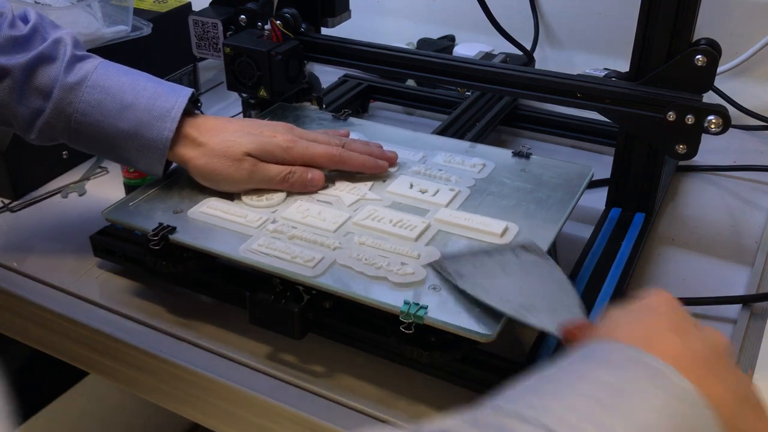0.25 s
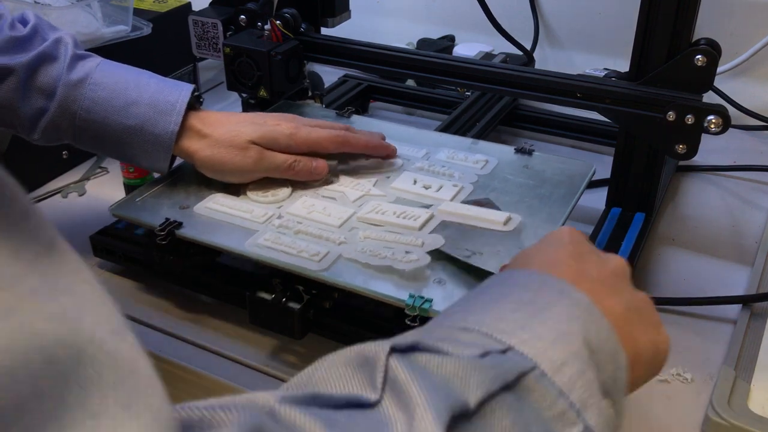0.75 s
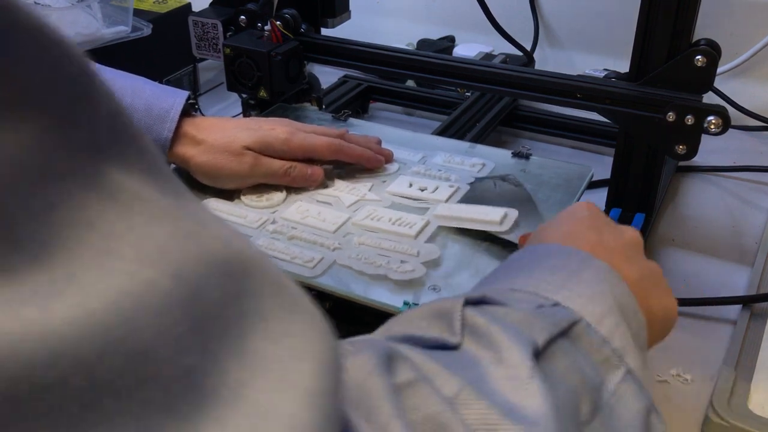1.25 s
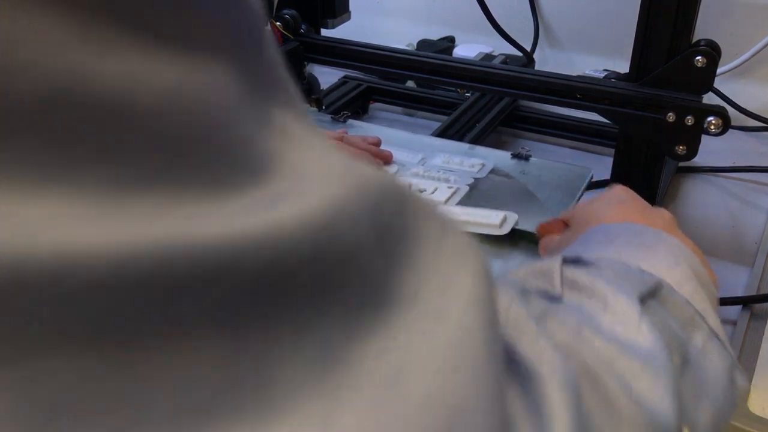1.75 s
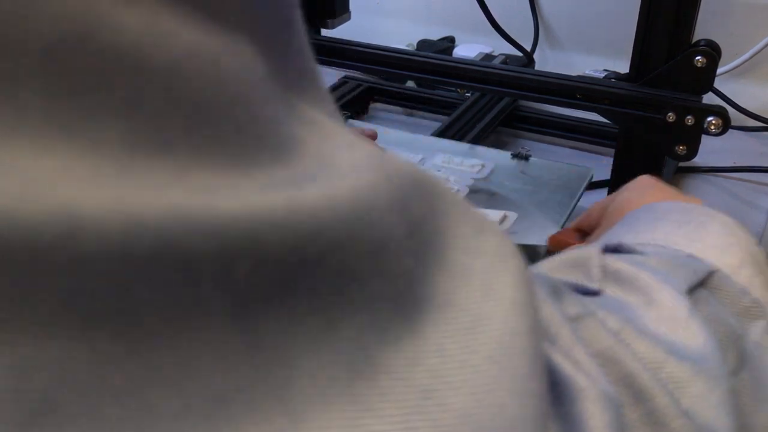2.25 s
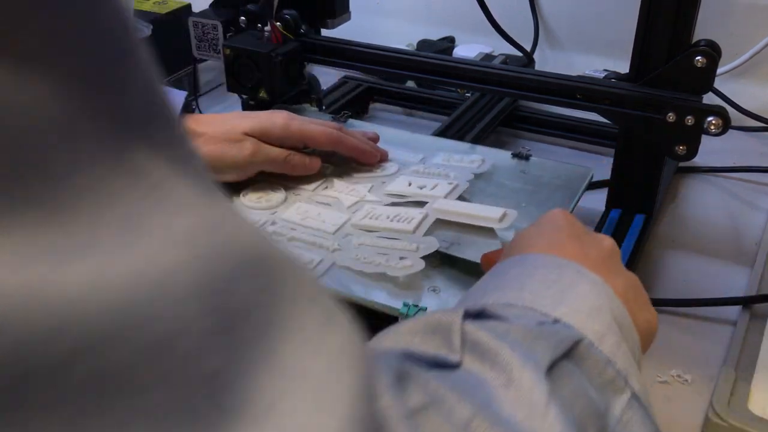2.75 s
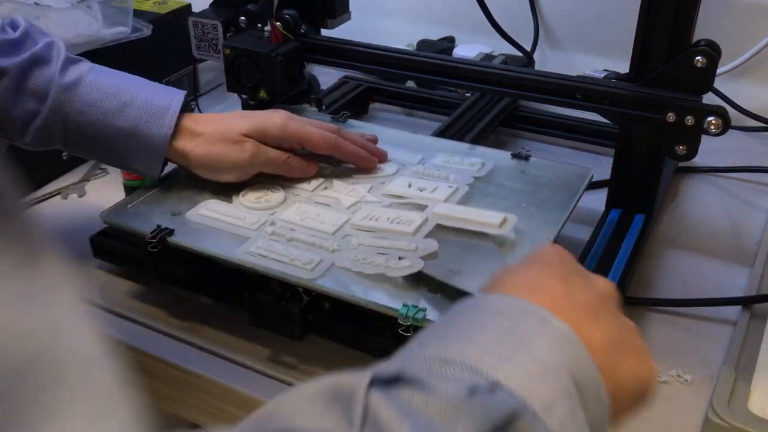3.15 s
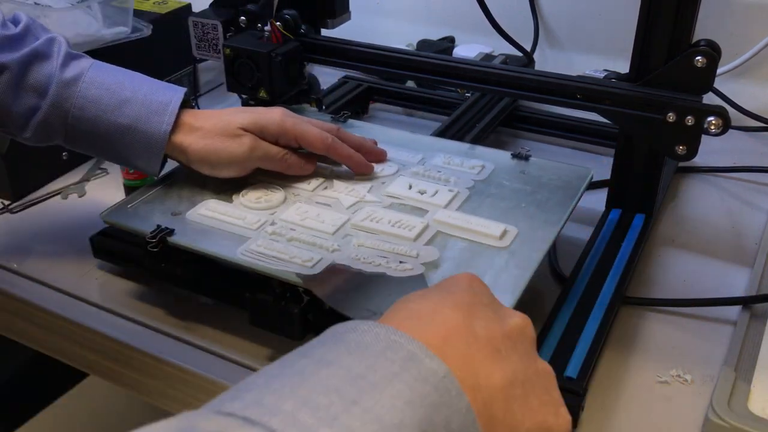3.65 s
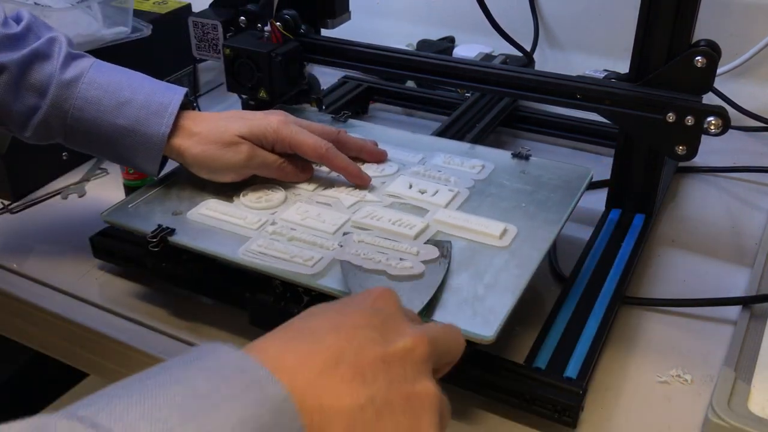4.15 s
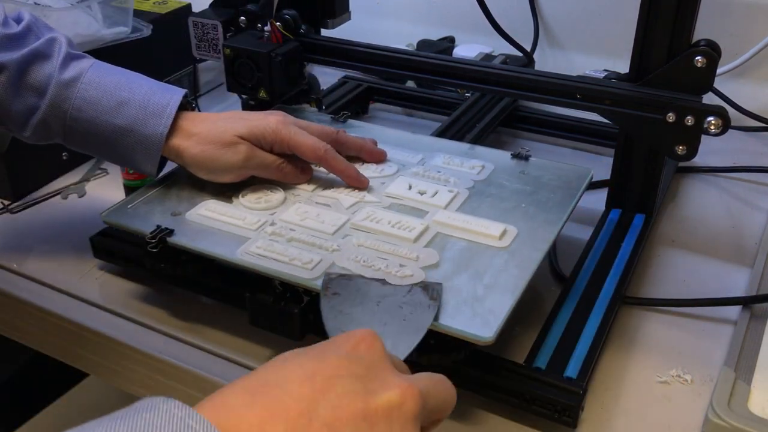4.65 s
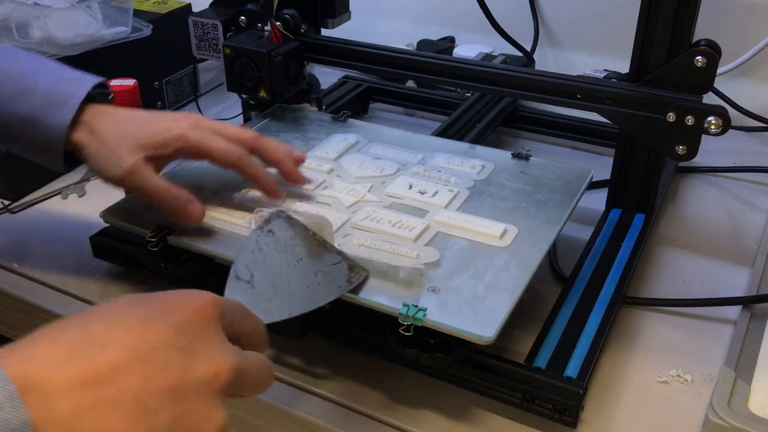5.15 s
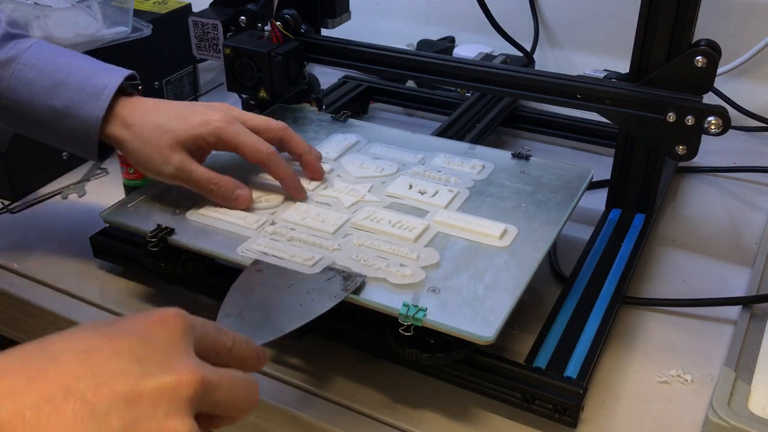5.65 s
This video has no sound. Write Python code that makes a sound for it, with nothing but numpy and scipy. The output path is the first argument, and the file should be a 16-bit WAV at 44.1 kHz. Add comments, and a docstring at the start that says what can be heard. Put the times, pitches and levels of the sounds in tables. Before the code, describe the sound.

A thin metal spatula pries plastic parts off a glass plate with sharp cracks, clicks and short gritty scrapes in a small room.

```python
"""At a workbench in a small room, a thin steel spatula is pushed under plastic parts stuck to a glass plate.
The bond gives way in sharp snaps: bursts of noise and a ringing tone. The blade scrapes gritty strokes of hiss.
The carriage under the plate knocks now and then with a few low tones, and light contact adds a faint treble hiss.
The room answers with short noise tails; ventilation rumbles and rushes behind. A phone close by picks it all up."""
import sys
import numpy as np
from scipy import signal
from scipy.fft import rfft, irfft, next_fast_len
from scipy.io import wavfile
from scipy.ndimage import uniform_filter1d, map_coordinates

SR = 44100
rng = np.random.default_rng(int(sys.argv[2]) if len(sys.argv) > 2 else 0)


def wrap_up_sound(samples):
    """Save the sound to the file named by the first command line argument, as 16-bit audio."""
    columns = np.atleast_2d(samples).T
    # keep every value between -1 and 1, then stretch to whole-number steps
    tamed = np.clip(columns, -1, 1)
    steps = np.round(tamed * 32767).astype(np.int16)
    wavfile.write(sys.argv[1], SR, steps)


N = 259308  # length [samples]

# The bond cracks or the blade hits: (time [s], level [dB], crack over rattle [dB],
# plate over blade body [dB], blade edge over blade body [dB], strongest ring [Hz])
SNAP_EVENTS = [(0.018, -38.5, 4, -1, -5, 3940), (0.029, -20.5, 19, -13, 8.5, 6540),
               (0.3589, -12, 6, -7, -4, 2590), (0.3662, -8.5, -4, -2, 3, 4150),
               (0.389, -16, 7, -19, 11, 6940), (.397, -24, 1, -11, 10, 5900),
               (0.4051, -11.5, 16, -9, -8, 7300), (0.413, -11, 0.5, 0, 4.5, 3640),
               (0.4234, -13, 11, 7, 6, 1635), (0.4542, -11.5, 2, -6.5, 3.5, 3430),
               (0.6256, -24.5, 3.5, -12, 0.5, 6800), (.7304, -36, -6, -1, 6, 1620),
               (0.75, -18.5, 0.5, 10, -2, 1708), (0.9574, -26.5, 6, -8, -1, 6000),
               (1.033, -33, 3, -10, 10, 6900), (1.182, -21.5, 6, -7, 2, 5200), (1.187, -20, 5, -6, 3, 6240),
               (1.2029, -18.5, 8, -7, 4, 6200), (1.2156, -24, -8, 10, -6, 4270),
               (1.2497, -26.5, -11, 4, 9, 2700), (1.264, -24.5, -5, -11, 1, 2890),
               (1.2712, -23, 3, -20, 5, 3980), (1.348, -30.5, -9, -6, -5, 4540),
               (1.362, -41, -13, 21, -20, 1820), (1.5062, -36.5, 3, -6, -2, 5240),
               (1.5246, -33.5, -5, -17, 7, 1910), (1.543, -25.5, 5, -11, 3, 4380),
               (1.553, -34, -9, -13, -15, 2200), (1.594, -39.5, -1, -10, -1, 1010),
               (1.6142, -29.5, 5, 2, 3, 2450), (1.6777, -38, -5, -18, -1, 5470),
               (1.7019, -30.5, -3, -5.5, -4, 5670), (1.7417, -39.5, -7, 38, -15.5, 1773),
               (1.821, -29, -14, 4, 5, 5170), (1.8396, -25, -5, -7, 0, 5200),
               (1.855, -21, 2.5, -5, -3, 5950), (1.873, -23, -10, 1, 8, 6800),
               (1.8863, -18, -5, -4, 10, 6930), (1.895, -23, -1, -9, 14, 6500),
               (1.9032, -11.5, 6, -0.5, 4.5, 4730), (1.913, -24.5, -14, 8, 3, 972),
               (1.936, -23, -4, 1, 0, 5200), (2.078, -31.5, -25, -15, -3, 4740),
               (2.3635, -45, -1, -5, 18, 1010), (2.42, -42, -2, -18, -7, 5560),
               (2.4633, -35, 0, -18, 13, 6260), (2.552, -37.5, -13, -3, -7, 6080),
               (2.6116, -16.5, 1, -3, -4.5, 4330), (2.6614, -24, -7, -3, 1, 2730),
               (2.672, -15.5, -3, -6, 1.5, 5870), (2.787, -39, -8, 2, 1, 4330),
               (2.843, -40, -14, 39, -19, 1970), (2.9568, -24, 11, -1, 9, 6850),
               (2.9644, -26, -9, -14, 1, 6740), (2.9793, -18.5, 24, -13, -2, 6200),
               (2.9846, -13.5, -6, -9, 3, 4100), (3.0052, -16, 4, -3, 3, 5670),
               (3.0347, -31.5, -10, 20, -15, 2910), (3.1348, -30.5, 4, 0, 17, 4460),
               (3.161, -23, 1.5, -3, -9, 4280), (3.1987, -25, -8, 15, 0, 1738),
               (3.328, -34.5, -8, 0, -7, 1860), (3.488, -34, -9, 10, -9, 2700),
               (3.4915, -25.5, -3, -10, 3.5, 1475), (3.7502, -45.5, 0, -4, 20, 1150),
               (3.8274, -20.5, 6.5, -3, 2, 1334), (3.9502, -36, -2, -1, 4, 4530),
               (4.1198, -31, -13, 16, -1, 3100), (4.1361, -22, 8, 11, 10, 3030),
               (4.1503, -13.5, 13, 7, 19, 2680), (4.1725, -24, -5, -2, -4, 6700),
               (4.179, -24, 6, -10, 15, 6300), (4.1825, -19, -9, -10, -1, 6460),
               (4.248, -36.5, -2, -12, 8, 6600), (4.258, -42, -13, 18, -21, 1914),
               (4.4016, -40.5, -2.5, 4, -15, 1670), (4.607, -30, -5, 8, -17, 1923),
               (4.674, -42, -4, 5, -8, 2930), (4.8274, -28.5, 0.5, 3, -5, 1410),
               (4.891, -41, 9, -6, 9, 950), (4.9017, -40, 15, -12, 2, 1520), (4.9824, -40, 5, -10, 5, 1060),
               (5.053, -26.5, 2.5, -3, 8, 6900), (5.1338, -34.5, -17, -12, 0, 6000),
               (5.192, -31.5, -10, -4, -7, 1200), (5.216, -28, -3, 2, 0, 3100),
               (5.234, -41, -2, -4, 7, 4470), (5.2518, -40, 0, 1, 6, 1590), (5.358, -30, -7, -9, -17, 4420),
               (5.407, -19.5, -8, 2, -6, 1228), (5.4095, -14.5, 2.5, -5.5, -1, 2140),
               (5.8767, -24, -4, -3, 4, 1020)]
# The blade slides: (time of most pressure [s], rise [s], fall [s], level [dB], plate over blade body [dB])
STROKE_EVENTS = [(0.206, 0.052, 0.045, -49, -0.5), (0.378, 0.044, 0.039, -31, 3.5),
                 (0.63, 0.036, 0.03, -49.5, 6), (0.744, 0.025, 0.032, -37.5, 8.5),
                 (0.986, 0.058, 0.047, -45.5, 1), (1.024, 0.062, 0.018, -38, 4),
                 (1.147, 0.035, 0.052, -49, -1), (1.178, 0.0088, 0.12, -42.5, 1),
                 (1.352, 0.0051, 0.024, -60, 10), (1.901, 0.017, 0.028, -24, -5),
                 (2.1, 0.087, 0.44, -55.5, -1), (2.28, 0.023, 0.048, -57, -13),
                 (2.462, 0.016, 0.016, -38.5, -6), (2.668, 0.016, 0.027, -35.5, 2.5),
                 (3.001, 0.035, 0.037, -27, -3.5), (3.219, 0.011, 0.18, -46, 5.5),
                 (3.445, 0.015, 0.041, -45.5, 0), (3.491, 0.018, 0.013, -34, 5.5),
                 (3.696, 0.029, 0.034, -47.5, 6.5), (3.833, 0.026, 0.0085, -39, 10),
                 (4.03, 0.046, 0.042, -50, 2.5), (4.155, 0.034, 0.03, -39.5, -6),
                 (4.277, 0.021, 0.075, -51.5, 2), (4.401, 0.008, 0.007, -52, 13),
                 (4.818, 0.046, 0.034, -47, -2.5), (5.19, 0.047, 0.057, -41, 1.5),
                 (5.36, 0.006, 0.15, -49, -10), (5.392, 0.043, 0.0098, -38, 11),
                 (5.86, 0.084, 0.1, -53.5, 5)]
# The carriage under the plate knocks: (time [s], level [dB], frame tone [dB over the knock level])
KNOCK_EVENTS = [(0.367, -46.5, 4.5), (0.439, -53, -13), (0.749, -48.5, 6), (1.371, -41.5, -8),
                (1.746, -38.5, -7), (1.887, -48, 4), (2.671, -46, -8), (2.849, -41, -5), (2.978, -43.5, 4),
                (3.209, -45, -5), (4.269, -42.5, 0.5), (4.401, -45.5, -6), (4.608, -34, -7.5)]
# Tones of the carriage: (frequency [Hz], level [dB], time to fall by 60 dB [s])
CARRIAGE_MODES = [(260, -2, 0.081), (310.6, -3.5, 0.24), (351.2, -1, 0.17), (428.4, 1, 0.14),
                  (518, -0.5, 0.11), (627, 4.5, 0.093)]
# Tones that blade and glass ring with: (frequency [Hz], width [Hz], level [dB])
BLADE_MODES = [(1134, 38, -38), (1520, 24, 5.5), (1773, 31, 4.5), (1960, 17, -11), (2450, 29, 2),
               (2695, 26, 4), (2986, 29, 2), (3400, 64, -6), (4380, 110, -0.5), (5440, 64, -12),
               (5780, 140, -3), (6200, 160, -1), (6800, 180, -6), (8500, 310, -4), (9620, 330, -8.5),
               (13200, 430, 6), (14600, 340, 16)]
# Colour of the force on the glass plate: (frequency [Hz], level [dB])
PLATE_COLOUR = [(200, -73), (600, -4.5), (1200, -4), (2500, 1.5), (4000, 0), (6000, -24), (20000, -47.5)]
# Colour of the force on the blade's body: (frequency [Hz], level [dB])
BODY_COLOUR = [(1500, -44), (3500, -7.5), (4500, 1), (8000, 0.5), (10000, -8), (20000, -12)]
# Colour of the force on the blade's edge: (frequency [Hz], level [dB])
EDGE_COLOUR = [(5000, -37), (8500, -0.5), (10500, 7.5), (13000, 2.5), (20000, -5)]
# Loudness of the faint treble hiss over time: (time [s], level [dB])
BRUSH_LEVEL = [(0, -50), (0.28, -104), (0.45, -62), (0.75, -68), (1.05, -62), (1.33, -63), (1.87, -62),
               (2.0, -45), (2.1, -62), (2.39, -73), (2.59, -54), (3.0, -60.5), (3.13, -45.5), (3.31, -56),
               (3.5, -95), (4.17, -60), (4.41, -72), (5.17, -70), (5.35, -55), (5.55, -74), (5.88, -100)]
# Colour of the faint treble hiss: (frequency [Hz], relative level per Hz [dB])
BRUSH_COLOUR = [(1500, -28), (3500, 9), (6500, 4.5), (9000, -1), (13000, 7), (20000, -9)]
# How long the room's answer lasts: (frequency [Hz], time to fall by 60 dB [s])
ROOM_DECAY = [(200, 0.14), (1500, 0.84), (4000, 0.66), (8000, 0.49), (16000, 0.24)]
# Colour of the ventilation rumble: (frequency [Hz], relative level per Hz [dB])
RUMBLE_COLOUR = [(15, -17), (24, -7), (33, -28), (45, -4), (65, -5), (92, 0.5), (120, -12), (146, -7),
                 (175, -13.5), (210, -14.5), (330, -18.5), (560, -26), (1500, -51), (3500, -47),
                 (16500, -79)]
# Loudness of the air rush over time: (time [s], level [dB])
RUSH_LEVEL = [(0, -56.5), (0.5, -59.5), (1.16, -54), (1.55, -59), (1.8, -54.5), (2.41, -57), (3.1, -53.5),
              (3.57, -58), (4.27, -54), (4.91, -55.5), (5.47, -60.5), (5.88, -55)]
# Colour of the air rush: (frequency [Hz], relative level per Hz [dB])
RUSH_COLOUR = [(300, -37), (600, 2.5), (1000, 3.5), (1400, 0), (2000, -5.5), (3100, -6), (3400, -25),
               (4500, -16), (9000, -44)]
# Band limit of the sound, a steep drop just above 16 kHz: (frequency [Hz], level [dB])
BAND_LIMIT = [(20, 0), (15800, 0), (16050, -22), (17000, -28)]
# The microphone port, with its notch: (frequency [Hz], level [dB])
PORT_RESPONSE = [(20, -0.5), (9500, -1), (10500, -7), (11500, -1), (20000, -11.5)]

RATTLE_UNDER_DB, RATTLE_T60_S = 9, 0.049  # t60: time to fall by 60 dB
RATTLE_DOUBLINGS_PER_DB = 0.0536  # a sharper crack rattles for longer
# Dull blows ring clearly, bright cracks at the edge hardly; the last two are dB of ring per dB of share
RING_DB, RING_PER_PLATE, RING_PER_EDGE = -3, 0.2, -0.4
FADE_DB, STROKE_EDGE_DB = 14, -1  # pressure lost over a rise or fall; edge over blade body
SWELL_S = 0.004  # build-up of a 300 Hz tone
TICKS_PER_S, TICK_DB = 85, 5  # stray grit under the resting blade; typical tick over the hiss
RUMBLE_DB = -44.5
TOP_HZ = 16960  # nothing is heard from here up


def amp(db):
    """Turn decibels into a plain multiplier."""
    return 10 ** (np.asarray(db) / 20)


def unit(x):
    """Scale to an average (rms) strength of one."""
    return x / np.sqrt(np.mean(x ** 2) + 1e-20)


def along(points, hz):
    """Read a curve of (frequency, value) points on a log frequency axis."""
    f, value = np.transpose(points)
    return np.interp(np.log(hz + 1), np.log(f + 1), value)


def wobble(rate):
    """A smooth random curve through `rate` random points a second."""
    points = rng.standard_normal(int(N * rate / SR) + 4)
    return map_coordinates(points, [np.arange(N) * rate / SR])


def filtered(x, response):
    """Multiply the spectrum of x by a response, given as a function of frequency."""
    m = next_fast_len(N + SR // 2)
    hz = np.fft.rfftfreq(m, 1 / SR)
    return irfft(rfft(x, m) * response(hz), m)[..., :N]


def coloured(x, points):
    """Colour a sound without smearing it ahead in time, keeping the power of white noise."""
    hz = np.fft.rfftfreq(2048, 1 / SR)
    cepstrum = irfft(np.log(amp(along(points, hz))))
    # Folding the second half onto the first gives a pulse that only looks forward in time
    cepstrum[1:1024] *= 2
    cepstrum[1025:] = 0
    pulse = irfft(np.exp(rfft(cepstrum)))
    return signal.fftconvolve(x, pulse / np.linalg.norm(pulse))[:N]


def shares(plate_db, edge_db):
    """Divide a contact force between plate, blade body and blade edge, keeping its power."""
    gains = amp([[plate_db], [0], [edge_db]])
    return gains / np.linalg.norm(gains)


def radiate(force, ring_db):
    """Plate, body and edge forces take their colours, then ring the resonances of blade and glass."""
    colours = (PLATE_COLOUR, BODY_COLOUR, EDGE_COLOUR)
    contact = sum(coloured(track, colour) for track, colour in zip(force, colours))

    def resonance(f):
        modes = sum(amp(db) * 1j * f * width / (centre * centre - f * f + 1j * f * width)
                    for centre, width, db in BLADE_MODES)
        return 1 + amp(ring_db) * modes

    return filtered(contact, resonance)


def patchy(x, depth_db):
    """Random gain patches over time and frequency: the contact point wanders and favours other modes."""
    z = signal.stft(x, nperseg=256)[2]
    field = uniform_filter1d(rng.standard_normal(z.shape), size=4, axis=0)  # smooth over frequency
    field = uniform_filter1d(field, size=5, axis=1)  # smooth over time
    gain_db = depth_db * unit(field) - depth_db ** 2 / 9  # deeper patches are turned down overall
    return signal.istft(z * amp(gain_db), nperseg=256)[1][:N]


def snaps():
    """Each snap: a sudden crack, a rattle that dies away, and the mode nearest the contact ringing out."""
    force, rings = np.zeros((3, N + SR)), np.zeros(N + SR)
    t = np.arange(SR // 8) / SR
    for s, db, crack_db, plate_db, edge_db, hz in SNAP_EVENTS:
        start = round(s * SR)
        rattle_db = db - RATTLE_UNDER_DB - 0.66 * max(crack_db, 0)  # a clean break leaves less rattle
        t60 = RATTLE_T60_S * 2 ** (RATTLE_DOUBLINGS_PER_DB * crack_db)
        crack = amp(crack_db - 60 * t / 0.0012)
        rattle = amp(-60 * t / t60)
        faint_tail = amp(-24.5 - 60 * t / 0.12)
        burst = (crack + rattle + faint_tail) * rng.standard_normal((3, len(t)))
        burst[1:, 0] = amp(crack_db + 13)  # the release is one sudden kick on the blade's body and edge
        force[:, start:][:, :len(t)] += shares(plate_db, edge_db) * amp(rattle_db) * burst

        drift = np.cumsum(0.17 * rng.standard_normal(len(t)))  # loose contact blurs the pitch
        ring_db = rattle_db + RING_DB + RING_PER_PLATE * plate_db + RING_PER_EDGE * edge_db
        ring_t60 = 1.7 * t60 * (3000 / hz) ** 0.34  # high modes die sooner
        ring = amp(ring_db - 60 * t / ring_t60) * np.sin(2 * np.pi * hz * t + drift)
        rings[start:][:len(t)] += ring * (1 - np.exp(-t / 0.00011))  # soften the ring's start
    return radiate(force[:, :N], ring_db=-1) + rings[:N]


def scrape():
    """Steel on glass: hiss whose pressure flutters, with grit that catches as tiny ticks."""
    pressure, t = np.zeros((3, N)), np.arange(N) / SR
    for s, rise, fall, db, plate_db in STROKE_EVENTS:
        times = [s - rise - 0.02, s - rise, s, s + fall, s + fall + 0.0067]
        levels = [-95, db - FADE_DB, db, db - FADE_DB, -95]  # the blade touches, presses and lifts
        pressure += shares(plate_db, STROKE_EDGE_DB) * amp(np.interp(t, times, levels))
    catches = rng.random(N) < 300 / SR  # about 300 a second
    grit = catches * amp(np.minimum(4 * rng.exponential(size=N), 12))
    grit = signal.lfilter([1], [1, -np.exp(-1 / (SR * 0.00054))], grit)  # each fades within milliseconds
    flutter_db = 0.83 * wobble(110) + 1.55 * np.array([wobble(40) for _ in pressure])
    rough = unit((1 + 0.52 * grit) * amp(flutter_db))
    return radiate(pressure * rough * rng.standard_normal((3, N)), ring_db=-1.0)


def knocks():
    """A dull blow rings the carriage's modes, the high ones building up last, and shoves the whole frame."""
    out, t = np.zeros(N + SR), np.arange(SR // 3) / SR

    def swell(hz):
        return 1 - np.exp(-(t / (SWELL_S * (hz / 300) ** 2)) ** 2)

    for s, db, frame_db in KNOCK_EVENTS:
        ring = np.zeros(len(t))
        for hz, mode_db, t60 in CARRIAGE_MODES:
            level = amp(mode_db + rng.normal(0, 2.2) - 60 * t / t60)  # each blow varies the balance
            ring += level * swell(hz) * np.sin(2 * np.pi * (hz * t + rng.random()))
        frame = amp(frame_db - 60 * t / 0.53) * swell(143) * np.sin(2 * np.pi * 143 * t)
        out[round(s * SR):][:len(t)] += amp(db) * (ring + frame)
    return out[:N]


def brush():
    """Light contact makes a faint treble hiss of patchy noise, with stray ticks of grit."""
    s, db = np.transpose(BRUSH_LEVEL)
    ticks = (rng.random(N) < TICKS_PER_S / SR) * amp(TICK_DB + 1.4 * rng.standard_normal(N))
    ticks = signal.lfilter([1], [1, -np.exp(-1 / (SR * 0.0024))], ticks)  # each fades within milliseconds
    noise = (1 + ticks) * rng.standard_normal(N)
    hiss = unit(filtered(noise, lambda hz: amp(along(BRUSH_COLOUR, hz))))
    level_db = np.interp(np.arange(N) / SR, s, db) + 0.4 * wobble(23.7)
    return amp(level_db) * patchy(hiss, depth_db=11.0)


def room(x):
    """Each frequency of the room's answer dies at its own speed; the scatter changes as the hands move."""
    out, step = np.zeros(N + 2 * SR), SR // 4
    for i in range(0, N, step):  # a fresh random tail for each quarter second
        hz, t, z = signal.stft(rng.standard_normal(SR // 2), SR, nperseg=256)
        decay = amp(-60 * t / along(ROOM_DECAY, hz)[:, None])
        tail = signal.istft(z * decay, SR, nperseg=256)[1]
        wet = signal.fftconvolve(x[i:i + step], tail / np.linalg.norm(tail))
        out[i + 200:][:len(wet)] += wet  # the answer starts 200 samples late
    return out[:N]


def ventilation():
    """Moving air as two noises: a slowly uneven low rumble, and a rush above it."""
    def noise(colour):
        return unit(filtered(rng.standard_normal(N), lambda hz: amp(along(colour, hz))))

    rush_db = np.interp(np.arange(N) / SR, *np.transpose(RUSH_LEVEL))
    rumble = amp(RUMBLE_DB + 2.1 * wobble(5.31)) * noise(RUMBLE_COLOUR)
    rush = amp(rush_db + 0.4 * wobble(6.1)) * noise(RUSH_COLOUR)
    return rumble + rush


def scene():
    """Add the spatula work, its answer from the room, the light contact and the ventilation."""
    work = snaps() + patchy(scrape(), depth_db=3.0) + knocks()
    return (work + amp(-13.5) * room(work) + brush() + ventilation())[None]


def record(dry):
    """The phone's port colours the treble; the band limit then drops it steeply and ends it at TOP_HZ."""
    def response(hz):
        return amp(along(BAND_LIMIT, hz) + along(PORT_RESPONSE, hz)) * (hz < TOP_HZ)

    return filtered(dry, response)


dry = scene()
out = record(dry)
wrap_up_sound(out)
```